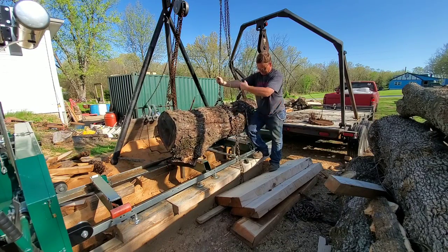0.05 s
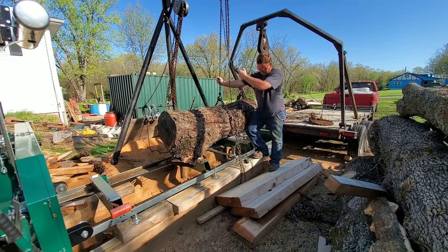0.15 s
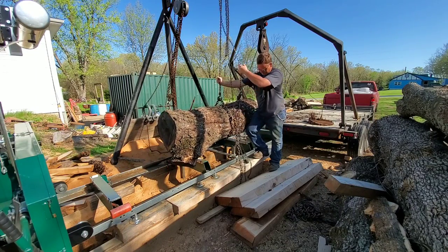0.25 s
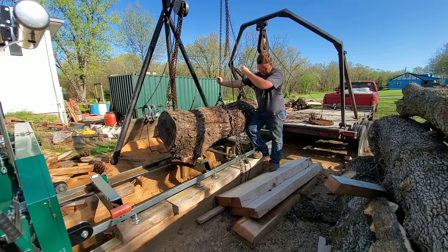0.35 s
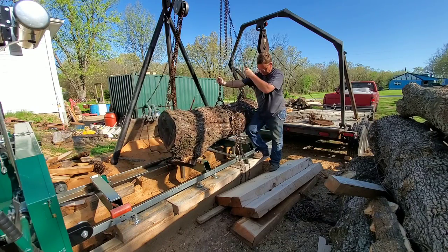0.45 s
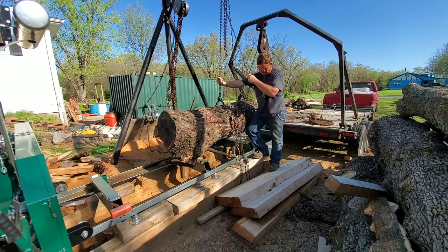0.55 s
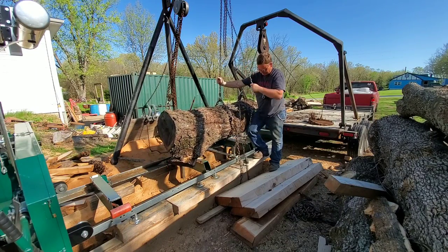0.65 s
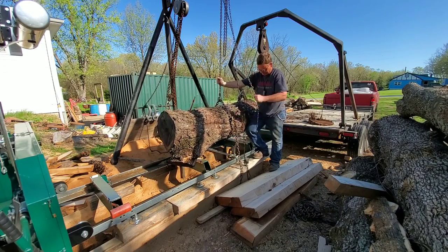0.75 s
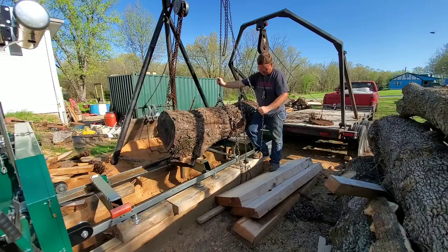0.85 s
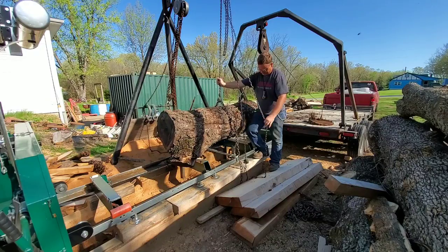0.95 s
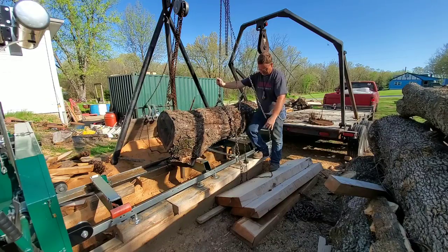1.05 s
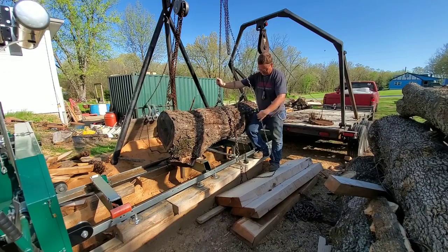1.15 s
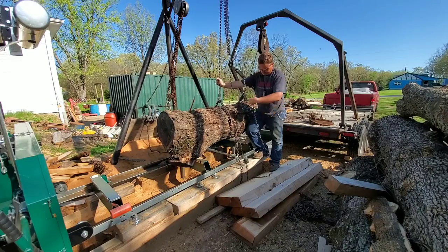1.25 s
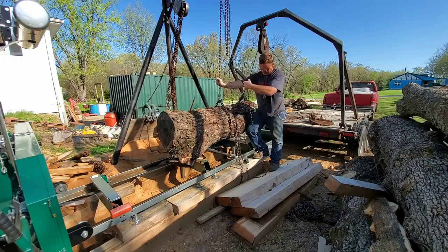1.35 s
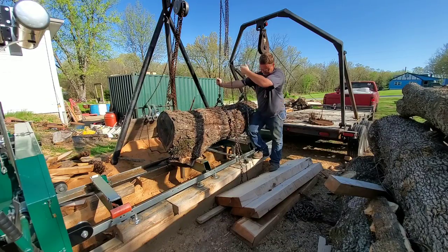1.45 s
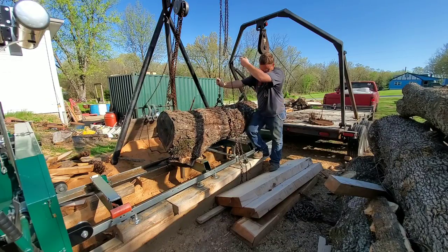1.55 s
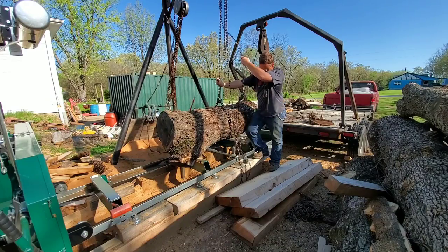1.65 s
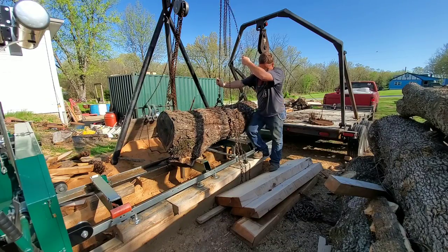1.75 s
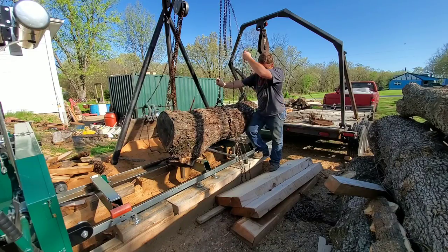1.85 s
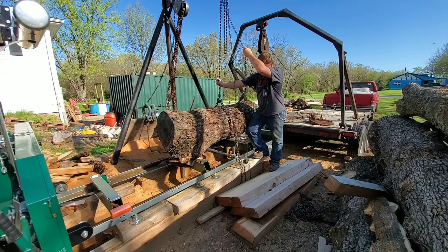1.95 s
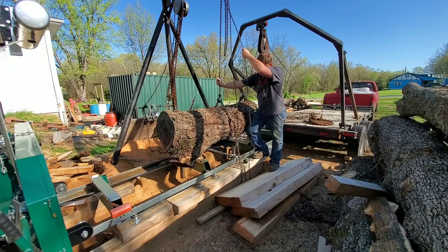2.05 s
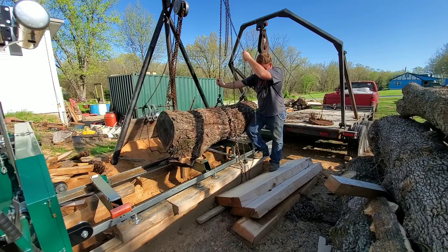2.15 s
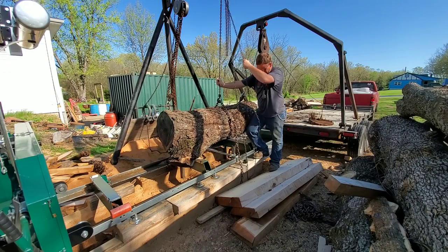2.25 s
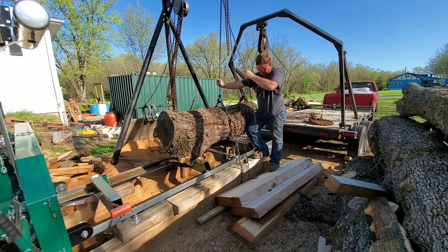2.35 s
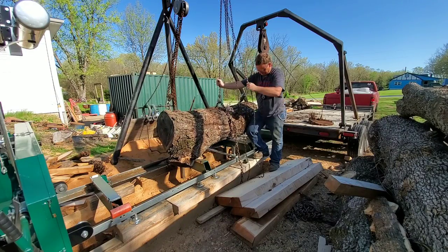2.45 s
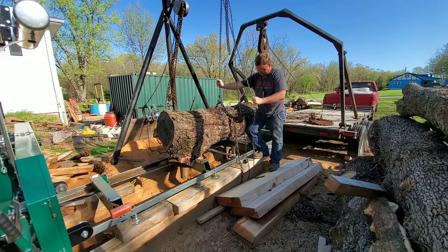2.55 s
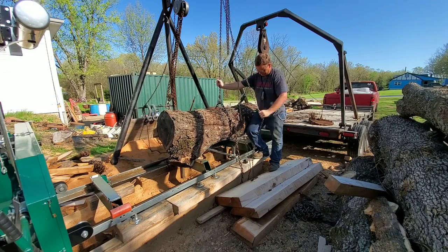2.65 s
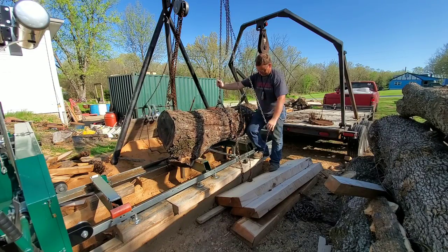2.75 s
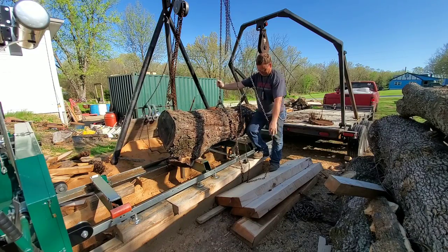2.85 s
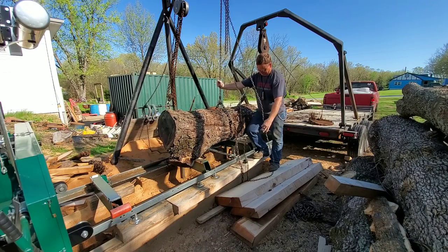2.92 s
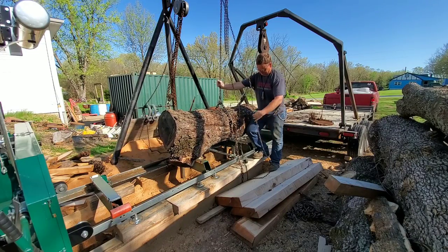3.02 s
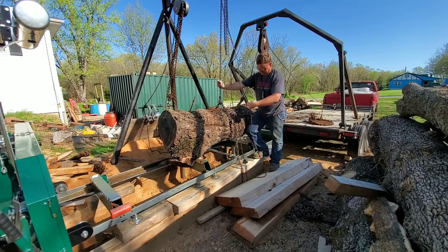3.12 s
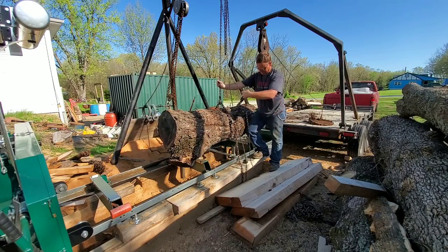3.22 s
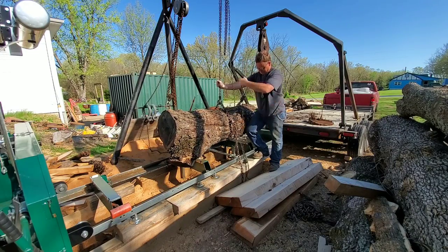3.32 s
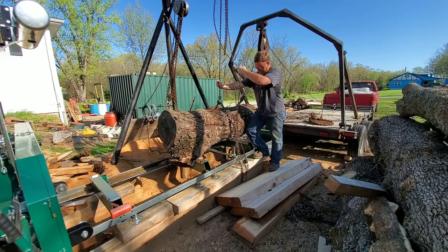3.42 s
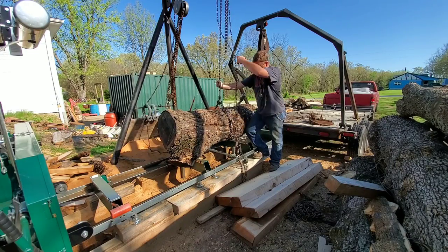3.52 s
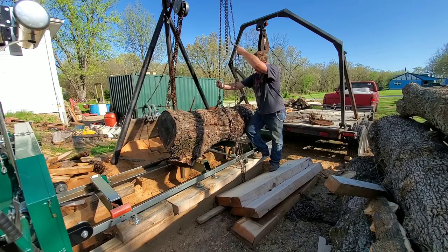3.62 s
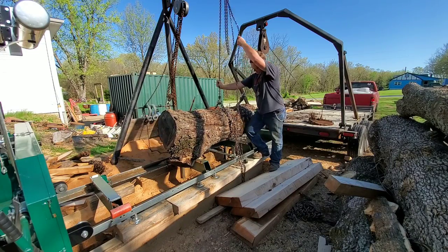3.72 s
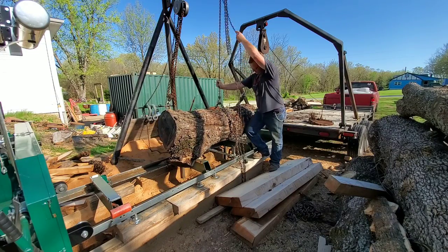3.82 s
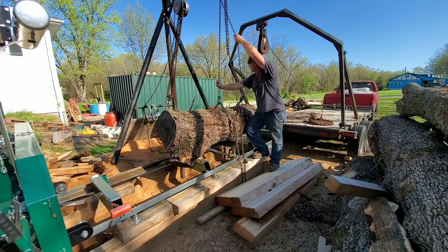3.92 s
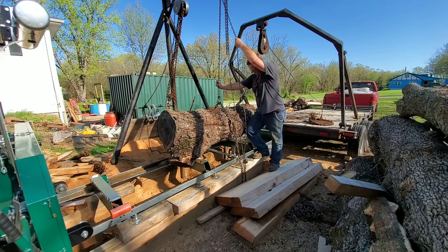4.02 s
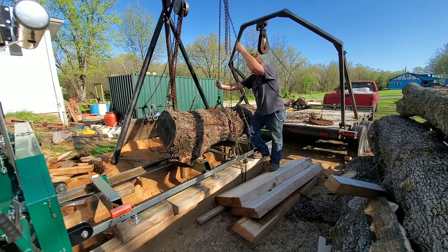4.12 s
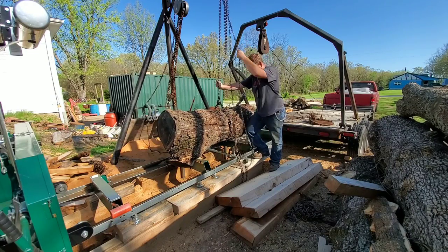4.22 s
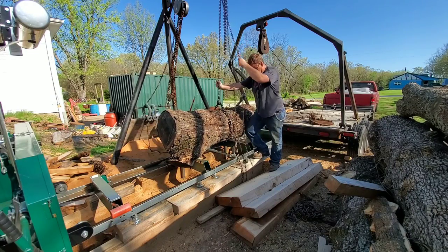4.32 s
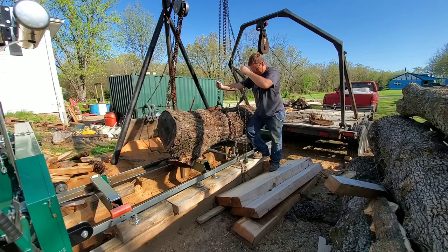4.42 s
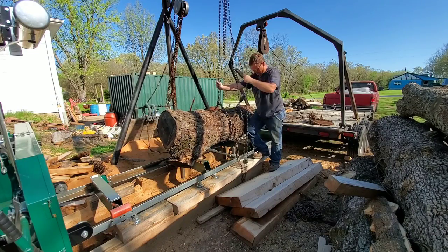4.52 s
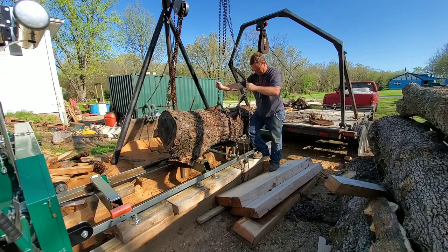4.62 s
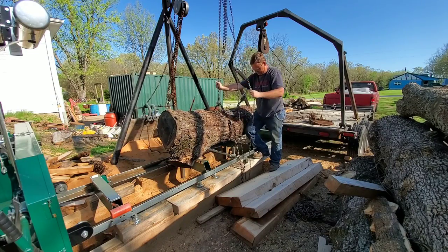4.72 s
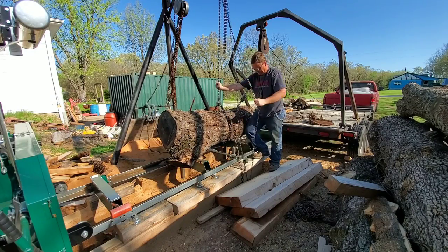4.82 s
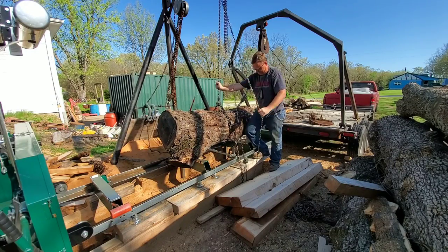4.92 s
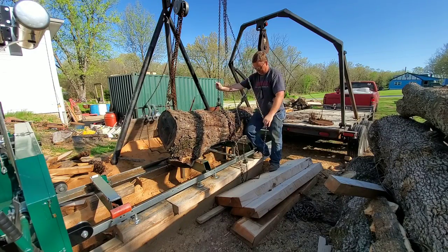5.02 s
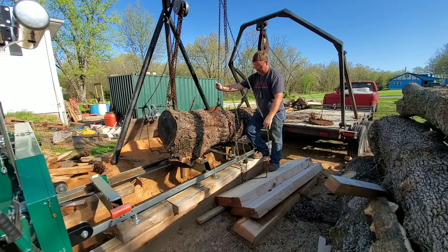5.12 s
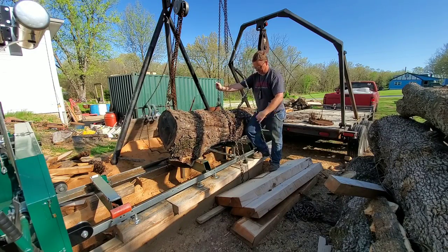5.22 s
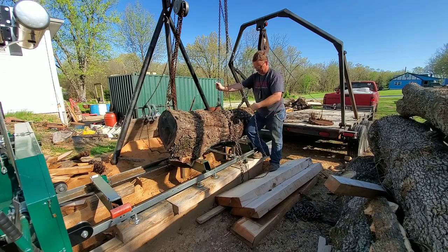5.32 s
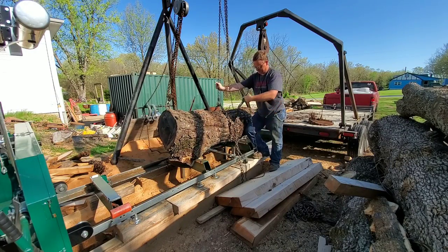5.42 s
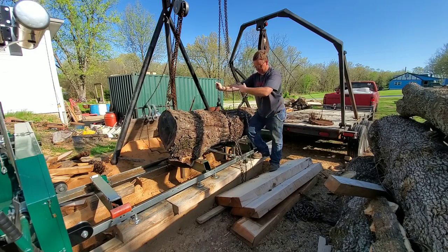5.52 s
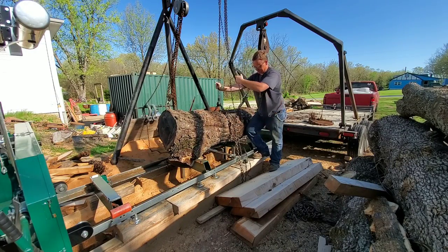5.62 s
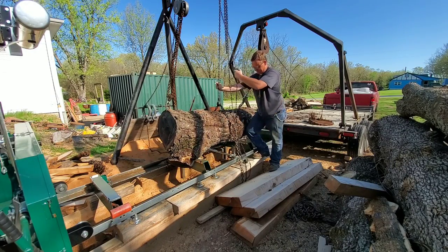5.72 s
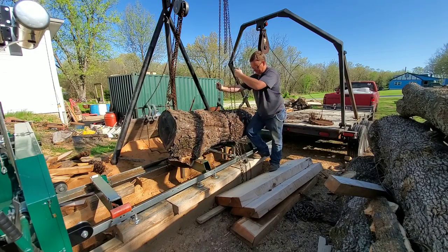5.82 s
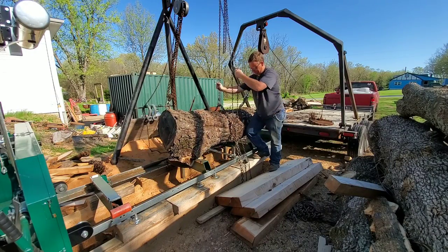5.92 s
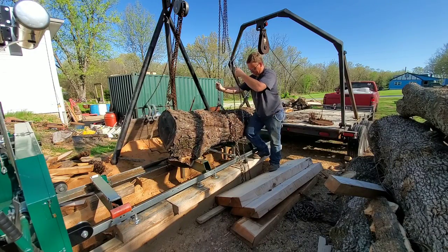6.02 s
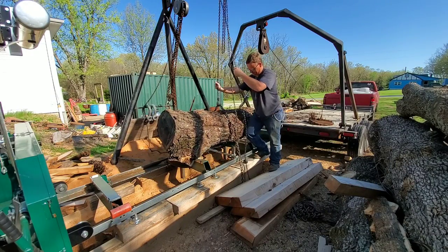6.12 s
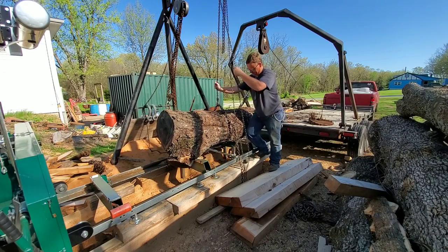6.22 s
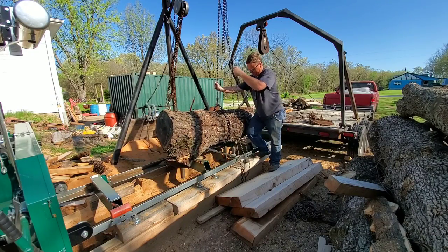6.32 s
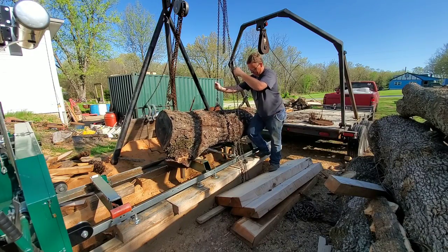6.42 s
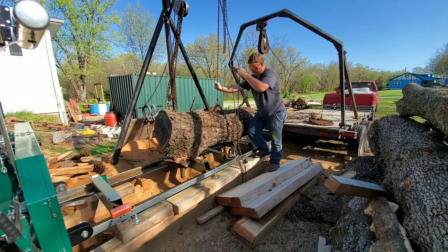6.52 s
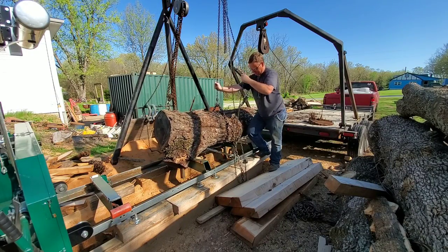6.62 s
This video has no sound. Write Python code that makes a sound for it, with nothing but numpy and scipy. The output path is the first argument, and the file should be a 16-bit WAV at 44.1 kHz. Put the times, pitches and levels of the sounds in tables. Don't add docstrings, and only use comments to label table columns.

```python
import sys
import numpy as np
from scipy import signal
from scipy.fft import rfft, irfft, next_fast_len
from scipy.io import wavfile
from scipy.ndimage import uniform_filter1d, map_coordinates

SR = 44100
rng = np.random.default_rng(int(sys.argv[2]) if len(sys.argv) > 2 else 0)


def dump(signal):
    limited = np.clip(np.atleast_2d(signal).T, -1, 1)
    pcm = np.round(limited * 32767).astype(np.int16)
    wavfile.write(sys.argv[1], SR, pcm)


def boost(x):
    u = np.asarray(x, float) / 20
    return 10 ** u


N = 294147
SPAN = 12288

# time in seconds, level in dB.
ENGINE_LEVEL = [
    (0, -88),
    (1.4, -47),
    (2.1, -40.5),
    (3.0, -52.5),
    (4.5, -43.5),
    (5.6, -50),
    (6.2, -53.5),
    (6.67, -49),
]
# frequency in Hz, spectral level in dB per Hz.
AIR_SPECTRUM = [(15, -76), (25, -23), (47, -8.5), (70, 0.5), (87, -11), (127, -10), (190, -17), (285, -18),
                (405, -31.5), (911, -29.5), (1840, -37.5), (2220, -36.5), (16000, -63.5)]
# time in seconds, frequency in Hz, level in dB.
BIRD_WHISTLE = [
    (.092, 3520, -62.5),
    (.1, 3500, -45),
    (.13, 3270, -48),
    (.15, 3120, -63),
]
# start in
# seconds, hold in seconds, frequency in Hz, level in dB.
HUMS_AND_SCRAPES = [(.01, 0.076, 272, -49.5), (0.6, 0.32, 220, -46.5), (0.656, 0.12, 514, -40.5),
                    (1.05, 0.14, 265, -44), (1.117, 0.12, 217, -46), (2.41, 0.57, 266, -49.5),
                    (3.003, 0.2, 240, -58.5), (3.422, 0.065, 417, -51.5), (3.63, 0.23, 591, -49.5),
                    (5.706, 0.033, 474, -46.5), (3.337, 0.053, 14200, -54), (3.538, .05, 14400, -44),
                    (5.55, .04, 14500, -48), (4.697, 0.43, 265.5, -47.5), (5.81, 0.093, 178, -57)]
# start in seconds, peak in dB, level of the deep leg part in dB.
JOLTS = [(0.262, -33, -30), (0.579, -26, -12), (1.035, -19.5, -18), (1.125, -26.5, -13),
         (1.245, -27, -11.5), (1.643, -31.5, -22), (1.78, -38.5, -11), (1.93, -31.5, -12),
         (2.395, -27.5, -24), (2.739, -34, -4), (3.407, -31.5, -14.5), (4.202, -16.5, -26),
         (4.485, -13.5, -19), (4.504, -15, -10), (5.693, -33, -20), (5.983, -44, -0.5), (6.594, -32.5, -20)]
# frequency in Hz, width in Hz, level in dB.
BEAM_MODES = [(410, 28, -11), (525.4, 20, 4.5), (523, 50, 2.5), (588, 39, -8.5), (668, 28, -5),
              (810, 420, -9)]
# frequency in Hz, width in Hz, level in dB.
LEG_MODES = [(205, 23, -3), (225.6, 13, 1), (317, 21, -2)]
# start in
# seconds, level in dB, frequency in Hz, 60 dB decay in seconds.
SINGLE_RINGS = [(.03, -36, 14400, .2), (0.044, -34.5, 13800, 0.42), (0.16, -27.5, 4530, 0.14),
                (1.21, -27, 1745, 0.27), (4.742, -10.5, 1745, 0.11), (4.79, -10.5, 1745, 0.17),
                (3.523, -43, 1735, 0.14), (3.53, -42, 822, 0.36), (3.627, -28, 865, 0.18),
                (3.631, -40, 916, 0.48), (3.63, -49, 1770, .4), (2.791, -17, 1600, 0.092),
                (2.908, -22.5, 1745, 0.4), (2.83, -18, 866, 0.087), (5.293, -25, 908, 0.31),
                (6.82, -26, 1502, 0.37), (4.335, -30, 490, 0.17), (4.488, -25, 214, 0.17),
                (4.5, -14, 540, 0.066), (2.4, -35.5, 780, 0.18), (1.62, -41.5, 360, 0.43)]
# start in seconds, peak in dB.
LINK_TICKS = [(0.262, -36), (1.588, -40), (1.6166, -29), (1.6386, -24), (1.8955, -12), (2.0561, -26),
              (3.2768, -44), (3.3349, -34), (3.3489, -33), (3.406, -25), (3.4237, -30), (3.4906, -44),
              (3.507, -42), (3.518, -40), (3.5599, -22), (3.6148, -30), (3.6706, -32), (3.7101, -35),
              (3.7799, -27), (5.305, -40), (5.343, -42), (5.4703, -35), (5.5661, -32), (5.5783, -13.5),
              (5.7103, -16), (6.336, -54), (0.942, -14), (1.0035, -12), (4.4885, -12), (6.5207, -48),
              (6.567, -32.5), (6.5888, -27)]
# time in seconds, running level in dB.
CHAIN_EFFORT = [(0, -37.5), (.5, -39.5), (.8, -25.5), (1.0, -28.5), (1.41, -44.5), (2.27, -31),
                (2.53, -27.5), (2.79, -23), (3.21, -45.5), (4.03, -39), (4.44, -23), (5.03, -26),
                (5.29, -37.5), (5.48, -43), (5.89, -38.5), (6.46, -70), (6.67, -30)]
# frequency in Hz, spectral level in dB per Hz.
LINK_SPECTRUM = [(1180, -20), (2000, -9.5), (2760, -8.5), (3170, 0.5), (3840, -5.5), (5880, -8.5),
                 (7980, -6), (9330, -3.5), (14400, -5.5), (16000, -6.5)]
# frequency in Hz, width in Hz, level in dB.
HOUSING_MODES = [(864, 27, 5), (938, 20.7, 1.5), (1019, 37, -0.5), (1213, 30, 0), (1518, 103, -2.5),
                 (1697, 180, -3), (1742, 49.3, 4), (1850, 33, -13), (2370, 330, -19), (3130, 250, -11.5),
                 (3167, 25, 2), (3366, 19, -4), (4346, 19, -7), (6030, 230, -14)]
# frequency in Hz, level in dB, 60 dB decay in seconds.
TUBE_MODES = [(1910, 7, 0.25), (3510, 6.5, 0.49), (2020, 15, 0.062), (4090, 6, 0.36), (4400, 2.5, 0.4),
              (4540, 0, 0.63), (4470, 1.5, 0.38), (4714, 7, 0.42), (2110, 2.5, 0.067), (2560, 14.5, 0.075),
              (6040, 4.5, 0.34), (4880, -4.5, 0.087), (6750, 2, 0.28), (5170, -18.5, 0.13)]
# frequency in Hz, spectral level in dB per Hz.
SLAP_SPECTRUM = [(410, -13), (700, -3), (1020, -10.5), (1200, 4), (1480, -2.5), (2160, 4), (2730, -0.5),
                 (4610, -2), (10000, -13), (16000, -46.5)]
# start in seconds, peak in dB, middle modes in dB,
# bright parts in dB, 60 dB chatter decay in seconds.
FIRST_PULL = [(0.551, -21, -9.5, -4, 0.14), (0.574, -15, -9.5, -5.5, 0.032), (0.631, -12, -14, -10, 0.12),
              (0.66, -16, -8, -4.5, 0.046), (0.68, -15, -1.5, -2, 0.25), (0.727, -16.5, -7, -1, 0.07),
              (0.774, -17, 0.5, -7, 0.044), (0.811, -17, 0, -8, 0.026), (0.838, -28, -21, 5, 0.032),
              (0.845, -15, -3, -6, 0.032), (0.879, -16, -17, -10.5, 0.043), (0.912, -12, -14.5, -9, 0.033),
              (0.941, -11, -8.5, -7, 0.033), (0.973, -12.5, -1.5, -6, 0.06),
              (1.002, -12, -2.5, -11.5, 0.044), (1.01, -18.5, -4, 1.5, 0.047),
              (1.033, -11.5, -1.5, -6.5, 0.11), (1.065, -16, -6.5, -6.5, 0.013),
              (1.096, -14.5, -2, -11, 0.023), (1.126, -19, -13, -1.5, 0.14), (1.173, -15, -25, -9, 0.4),
              (1.244, -20, -4, -8, 0.066)]
SECOND_PULL = [(2.175, -28, -6, -28, 0.069), (2.2, -29, 2.5, -4.5, 0.11), (2.286, -17, 1.5, -7, 0.11),
               (2.351, -15.5, -0.5, -6, 0.071), (2.387, -14.5, -20, -6, 0.05),
               (2.399, -13, -1.5, -5, 0.026), (2.44, -15.5, 0, -6.5, 0.022),
               (2.472, -12.5, -8.5, -9.5, 0.029), (2.506, -20.5, -3, -4, 0.046),
               (2.538, -17, 2.5, -6, 0.046), (2.572, -18, 1.5, -0.5, 0.068), (2.6, -17.5, 1.5, -7, 0.05),
               (2.63, -13.5, 0, -6, 0.05), (2.658, -15.5, -3, -2.5, 0.095), (2.684, -16, -12, -2.5, 0.076),
               (2.712, -19, -5, -8, 0.054), (2.738, -20.5, 3.5, -3, 0.05), (2.763, -13, -2, -8, 0.059),
               (2.791, -12.5, 3, -7.5, 0.077), (2.821, -19.5, -1, -4.5, 0.055),
               (2.846, -18.5, -6, -4, 0.044), (2.871, -16, -9.5, -8, 0.055), (2.905, -18, -3, -9, 0.045),
               (2.941, -18.5, 6, -5, 0.041), (2.988, -20, -2, -8.5, 0.05), (3.018, -33, -24, -8, 0.05),
               (3.056, -40, 2.5, 1.5, 0.026)]
THIRD_PULL = [(4.065, -23.5, -7, -5, 0.03), (4.137, -24.5, -9, -8, 0.15), (4.167, -23, -2, -5, 0.17),
              (4.201, -20.5, -6, -1.5, 0.016), (4.224, -18, -1.5, -3.5, 0.1),
              (4.272, -23.5, -16, -3.5, 0.041), (4.287, -11.5, -2.5, -8, 0.1), (4.337, -26.5, 5, 2, 0.086),
              (4.345, -14.5, 0.5, -2, 0.07), (4.36, -25, -4, 7.5, 0.25), (4.396, -22.5, -16, -3.5, 0.065),
              (4.405, -11.5, -1.5, -9.5, 0.037), (4.454, -8.5, -0.5, -5.5, 0.052),
              (4.489, -9, -9, -6.5, 0.053), (4.505, -18.5, 10.5, 0.5, 0.12), (4.557, -17.5, 3.5, -5, 0.012),
              (4.601, -17, -3, -5.5, 0.065), (4.648, -11, 1.5, -9, 0.036), (4.691, -14.5, -5, -3.5, 0.16),
              (4.742, -8, -11.5, -15.5, 0.025), (4.767, -34, -7, -9, 0.042), (4.793, -19.5, 9.5, 2, 0.035),
              (4.84, -13, -1, -6, 0.098), (4.886, -10, 2, -5.5, 0.054), (4.93, -13, -0.5, -3.5, 0.08),
              (4.972, -11, -3, -6, 0.021), (5.007, -13.5, -7.5, -5, 0.053), (5.048, -16.5, 2.5, -1, 0.088),
              (5.086, -18.5, 4.5, -2.5, 0.045), (5.12, -15.5, 0, -4.5, 0.094), (5.161, -14.5, 1, -8, 0.062),
              (5.208, -19.5, -1.5, -8.5, 0.05), (5.288, -24.5, -5.5, -12, 0.25)]
# start in seconds, tube level in dB, links level in dB.
CHAIN_SLAPS = [(.15, -26.5, -36), (0.313, -27.5, -43), (1.455, -32, -37), (1.617, -33, -59),
               (1.646, -22, -25), (1.784, -46, -73), (1.833, -42, -63), (1.892, -37, -24),
               (2.053, -25, -64), (3.131, -31, -42.5), (4.05, -67, -57), (3.507, -71, -73),
               (3.741, -36.5, -52), (3.843, -31.5, -42.5), (5.472, -28, -37.5), (5.691, -48, -67),
               (5.711, -19.5, -28), (5.85, -30.5, -41.5), (6.167, -40.5, -52.5), (6.588, -24, -44)]
# start in seconds, housing level in dB, middle modes in dB,
# tube and links level in dB.
WHEEL_TUGS = [(0.041, -60, -20, -47), (0.246, -23.5, -19, -35), (0.261, -26, -4, -34),
              (0.407, -23, -14, -38), (0.454, -17.5, 1.5, -26.5), (1.29, -28, -6, -58),
              (1.362, -32, -9, -39), (1.404, -39, -7.5, -49), (1.589, -31, -4, -53), (1.632, -24, 1, -35),
              (1.886, -26.5, -4, -46), (1.896, -12, -4.5, -19.5), (1.982, -33, -18, -35.5),
              (2.045, -29, 3, -35), (3.188, -33, -5, -50), (3.258, -39, -4, -65),
              (3.407, -25.5, 3.5, -35.5), (3.421, -27.5, 2, -53), (3.524, -37.5, -1, -46),
              (3.569, -50, -14, -59), (3.629, -29, -11, -40), (3.712, -43, -15, -42),
              (3.784, -37, -16, -36.5), (3.903, -24.5, 1.5, -36), (3.908, -19, -1, -46),
              (3.946, -27.5, -19, -38.5), (5.377, -42, -11, -67), (5.44, -42, -9, -58),
              (5.461, -33, 10, -39), (5.625, -51, -3, -49), (5.664, -30.5, -6, -59),
              (5.679, -28, -1.5, -37), (5.796, -39, -15, -39), (5.827, -41.5, 0.5, -43),
              (5.921, -20.5, -1, -34.5), (5.984, -40, 7, -67), (6.006, -26.5, -3, -47),
              (6.075, -45, -2.5, -51), (6.103, -32, -3.5, -42.5), (6.248, -41, 1, -51.5),
              (6.524, -38.5, -0.5, -49.5), (6.549, -47.5, 4, -57), (6.578, -36, 6, -28),
              (6.654, -26.5, -1, -37)]
# start in seconds, level in dB, 60 dB chatter decay in seconds.
LINK_CLINKS = [(0.042, -32, 0.004), (0.4052, -29.5, 0.012), (0.4568, -14, 0.0097), (0.513, -26, 0.0097),
               (1.289, -32, 0.006), (1.363, -34, 0.0075), (1.4116, -29.5, 0.0069), (1.583, -44, 0.006),
               (1.6033, -40, 0.0051), (1.6324, -31, 0.0034), (1.711, -19.5, 0.011), (1.89, -16, 0.0042),
               (1.897, -6, 0.013), (2.156, -29, 0.006), (3.244, -37.5, 0.0066), (3.276, -41, 0.0067),
               (3.3823, -38, 0.0063), (3.403, -28, 0.0042), (3.4233, -21.5, 0.0059), (3.4905, -46, 0.0054),
               (3.5064, -50, 0.0044), (3.5184, -39, 0.006), (3.5349, -30.5, 0.01), (3.671, -30.5, 0.0051),
               (3.6894, -37, 0.006), (3.711, -29, 0.0043), (3.7264, -29, 0.009), (3.812, -38, 0.006),
               (3.8866, -30, 0.0065), (3.8996, -22.5, 0.022), (3.947, -20.5, 0.0099), (4.0018, -42, 0.006),
               (4.052, -30, 0.0036), (5.3772, -56, 0.0078), (5.4166, -47, 0.005), (5.4544, -42, 0.0049),
               (5.576, -29, 0.0058), (5.6246, -37, 0.0067), (5.694, -36, 0.0037), (5.9256, -19, 0.011),
               (5.9834, -41, 0.006), (6.007, -33, 0.014), (6.0686, -40, 0.0071), (6.104, -31, 0.0085),
               (6.1384, -53, 0.0049), (6.335, -48, 0.0073), (6.5246, -53, 0.006), (6.549, -56, 0.0053)]
# frequency in Hz, correlation from 0 to 1.
LIKENESS = [(40, 0.82), (140, 0.96), (330, 0.89), (700, 0.66), (1650, 0.43), (4970, 0.21), (15000, 0.29)]
# frequency in Hz, left over right in dB.
SIDE_LEAN = [(60, 1), (150, -1.5), (380, 1), (950, 0.5), (2380, 0.5), (5980, -4.5), (15000, -1.5)]
# frequency in Hz, width in Hz, depth from 0 to 1.
CASE_NOTCHES = [
    (8005, 285, 0.93),
    (10700, 950, 0.68),
]


def unit(x):
    return x / np.sqrt(np.mean(x ** 2) + 1e-20)


def along(points, hz):
    f, v = np.transpose(points)
    return np.interp(np.log(hz + 1), np.log(f + 1), v)


def curves(rows):
    s, *cols = np.transpose(rows)
    return [np.interp(np.arange(N) / SR, s, c) for c in cols]


def wobble(rate):
    return map_coordinates(rng.standard_normal(int(N * rate / SR) + 4), [np.arange(N) * rate / SR])


def fall_db(t, t60):
    return -60 * t / t60


def add_at(out, s, sound):
    out[:, round(s * SR):][:, :sound.shape[1]] += sound


def filtered(x, response):
    m = next_fast_len(x.shape[-1] + 2048)
    return irfft(rfft(x, m) * response(np.fft.rfftfreq(m, 1 / SR)), m)[..., :x.shape[-1]]


def resonances(modes, scatter_db=0):
    c, w, db = np.transpose(modes)[:, :, None]
    strength = unit(boost(scatter_db * rng.standard_normal(len(modes))))
    gain = strength * (-1) ** np.arange(len(modes)) * boost(db[:, 0])
    return lambda f: gain @ (1j * f * w / (c * c - f * f + 1j * f * w))


def metallic(spectrum, peaks_db):
    peaks = peaks_db * rng.standard_normal(400)
    return lambda f: boost(along(spectrum, f) + np.interp(f, np.linspace(0, SR / 2, len(peaks)), peaks))


def spiky(shape, spread_db):
    return unit(rng.standard_normal(shape) * boost(spread_db * rng.standard_normal(shape)))


def stereo(pair):
    def mid_side(hz):
        angle = np.arccos(np.clip(along(LIKENESS, hz), -1, 1)) / 2
        return np.array([np.cos(angle), np.sin(angle)])
    mid, side = filtered(pair, mid_side)
    return np.array([mid + side, mid - side])


def engine_order(hz, drift):
    phase = 2 * np.pi * np.cumsum(hz + drift * wobble(2.9)) / SR
    return np.sqrt(2) * np.sin(phase) * boost(3.5 * wobble(6.1))


def yard():
    upper_db, = curves(ENGINE_LEVEL)
    engine = boost(upper_db) * engine_order(81, drift=0.68) + boost(-53) * engine_order(62.5, drift=3.53)
    air = unit(filtered(rng.standard_normal((2, N)), lambda f: boost(along(AIR_SPECTRUM, f))))
    return engine + boost(-51 + 0.3 * wobble(5.3)) * stereo(air)


def bird():
    hz, db = curves(BIRD_WHISTLE)
    t = np.arange(N) / SR
    sounding = (t > BIRD_WHISTLE[0][0]) * (t < BIRD_WHISTLE[-1][0])
    return boost(db) * sounding * np.sin(2 * np.pi * np.cumsum(hz) / SR)


def effort(level_db, grows):
    return level_db + grows * (curves(CHAIN_EFFORT)[0] + 30)


def frame():
    t = np.arange(N) / SR

    def mode(hz, width_hz):
        return unit(filtered(spiky((2, N), spread_db=6.5), resonances([(hz, width_hz, 0)])))

    hums = 0
    for s, hold_s, hz, db in HUMS_AND_SCRAPES:
        swell_db = -300 * np.maximum(s - t, 0) - 120 * np.maximum(t - s - hold_s, 0)
        speed = 0.5 + hz / 4000
        hums = hums + boost(db + speed * swell_db) * mode(hz, 0.038 * hz)
    rumble = boost(effort(level_db=-45, grows=0.48)) * mode(548, 400)
    return stereo(hums + rumble)


def thuds():
    out, t = np.zeros((2, N + SPAN)), np.arange(SPAN // 2) / SR
    for s, db, deep_db in JOLTS:
        push = spiky((2, len(t)), spread_db=8) * boost(fall_db(t, 0.14))
        beam = filtered(push, resonances(BEAM_MODES, scatter_db=3.5))
        legs = filtered(push, resonances(LEG_MODES, scatter_db=11.5))
        add_at(out, s, boost(db + 23) * (beam + boost(deep_db + 4.5) * legs))
    return stereo(out[:, :N])


def tinks():
    t = np.arange(N) / SR
    out = 0
    for s, db, hz, t60 in SINGLE_RINGS:
        out = out + (t > s) * boost(db + fall_db(np.abs(t - s), t60)) * np.sin(2 * np.pi * hz * t)
    return out


def ticks():
    out, t = np.zeros((2, N + SPAN)), np.arange(SPAN // 8) / SR
    for s, db in LINK_TICKS:
        envelope = boost(fall_db(t, .004)) + boost(-10 + fall_db(t, .03))
        burst = rng.standard_normal((2, len(t))) * envelope
        add_at(out, s, boost(db - 6) * burst * (1 - t / t[-1]))
    return stereo(filtered(out[:, :N], lambda f: (1j * f / (5000 + 1j * f)) ** 2))


def running_chain():
    clumps_db = 2.5 * wobble(30)
    grind = unit(filtered(spiky((2, N), spread_db=6), resonances(HOUSING_MODES)))
    grind_db = effort(level_db=-30.5, grows=1.54) + clumps_db - 7.5
    z = signal.stft(spiky((2, N), spread_db=1.5), nperseg=1024)[2]
    singing = uniform_filter1d(rng.standard_normal(z.shape[1:]), 5, axis=1) * np.sqrt(5)
    jingle = signal.istft(z * boost(6.1 * singing), nperseg=1024)[1][:, :N]
    jingle = unit(filtered(jingle, lambda f: boost(along(LINK_SPECTRUM, f))))
    jingle_db = effort(level_db=-34.5, grows=1.64) + clumps_db - 6.5
    return stereo(boost(grind_db) * grind + boost(jingle_db) * jingle)


def strikes():
    rows = []
    usual_db = -12
    for s, db, middle_db, bright_db, chatter_s in FIRST_PULL + SECOND_PULL + THIRD_PULL:
        excess_db = db + bright_db - usual_db
        crisp_db = -3 * np.log2(np.clip(chatter_s, .01, .3) * 20)
        tube_db = usual_db - 12 + 0.71 * excess_db
        links_db = usual_db - 7 + 0.99 * excess_db + crisp_db
        rows.append((s, db + 10, middle_db + 2.5, bright_db + 7, tube_db, links_db, chatter_s))
    for s, db, links_db in CHAIN_SLAPS:
        rows.append((s, db - 26.5, 0, 0, db, links_db, 0.072))
    for s, db, middle_db, side_db in WHEEL_TUGS:
        rows.append((s, db + 6, middle_db + 2.5, -3, side_db - 6, side_db - 15, 0.051))
    for s, db, chatter_s in LINK_CLINKS:
        rows.append((s, -120, 0, 0, -120, db - 12, chatter_s))
    return rows


def housing(middle_db, bright_db):
    modes = []
    for hz, width_hz, db in HOUSING_MODES:
        raised_db = middle_db if 1350 < hz < 2300 else bright_db * (hz > 2300)
        modes.append((hz * (1 + .012 * rng.standard_normal()), width_hz, db + raised_db))
    return resonances(modes, scatter_db=4)


def clack(t, housing_db, middle_db, bright_db, chatter_s):
    chatter_s = np.clip(chatter_s, .01, .3)
    blow = signal.windows.hann(9)
    envelope = boost(-12 + fall_db(t, chatter_s)) + boost(-18.5 + fall_db(t, 0.52))
    push = spiky((2, len(t)), spread_db=6.5) * envelope
    push[0, :len(blow)] += boost(11 - 0.5 * np.log2(chatter_s * 20)) * blow
    sound = boost(housing_db + 9) * filtered(push, housing(middle_db, bright_db))
    sound[0, :len(blow) - 1] += boost(housing_db - 19) * np.diff(blow)
    return sound


def tube_rings(t):
    hz, db, t60 = np.transpose(TUBE_MODES)[:, :, None]
    clear = boost(db + fall_db(t, np.clip(t60, .04, .22))) * np.exp(2j * np.pi * hz * t)
    fine_hz = 1900 + 11000 * rng.random((40, 1)) ** 1.2
    fine_db = along(SLAP_SPECTRUM, fine_hz) - 4 + fall_db(t, 0.022 + 0.58 * rng.random((40, 1)))
    fine = boost(fine_db) * np.exp(2j * np.pi * fine_hz * t)
    return np.vstack([clear, fine]).astype(np.complex64)


def tube_slap(t, tube_db, rings, rebounds):
    shape = (2, len(rings))
    strengths = boost(4 * rng.standard_normal(shape)) * np.exp(2j * np.pi * rng.random(shape))
    rise = 1 - np.exp(-t / .0025)
    dense = unit(filtered(spiky((2, len(t)), spread_db=2.5), metallic(SLAP_SPECTRUM, peaks_db=6)))
    crack = boost(4 + fall_db(t, 0.0091))
    dying = boost(fall_db(t, 0.25)) * rebounds * rise ** 0.13 + crack
    ringing = rise * (strengths.astype(np.complex64) @ rings).imag
    return boost(tube_db) * (boost(-1) * dense * dying + boost(-16) * ringing)


def link_shake(t, links_db, chatter_s, rebounds):
    shake = unit(filtered(spiky((2, len(t)), spread_db=0.5), metallic(LINK_SPECTRUM, peaks_db=4.5)))
    rise = 1 - np.exp(-t / (0.045 * np.clip(chatter_s, .003, .06)))
    fade_s = 3.38 * np.clip(chatter_s, .003, .3)
    settling = boost(fall_db(t, fade_s)) + boost(-1.5 + fall_db(t, np.minimum(0.17, 2 * fade_s)))
    return boost(links_db + 3) * shake * rise * rebounds * settling


def contacts():
    out, t = np.zeros((2, N + SPAN)), np.arange(SPAN // 2) / SR
    rings = tube_rings(t)
    for s, housing_db, middle_db, bright_db, tube_db, links_db, chatter_s in strikes():
        landing_db = np.interp(t, np.linspace(0, t[-1], 40), rng.standard_normal(40))
        rebounds = boost(2 * (t > .008) * landing_db)
        sound = clack(t, housing_db, middle_db, bright_db, chatter_s)
        sound = sound + tube_slap(t, tube_db, rings, rebounds)
        sound = sound + link_shake(t, links_db, chatter_s, rebounds)
        add_at(out, s, sound * np.sqrt(1 - t / t[-1]))
    return stereo(out[:, :N])


def scene():
    background = yard() + bird()
    gantry = frame() + thuds() + tinks()
    return background + gantry + ticks() + running_chain() + contacts()


def roll_off(x):
    return signal.sosfilt(signal.butter(12, 16800, fs=SR, output="sos"), x)


def record(dry):
    def microphone(f):
        case = np.prod([1 - depth / (1 + (2 * (f - hz) / w) ** 2) for hz, w, depth in CASE_NOTCHES], axis=0)
        lean = boost(along(SIDE_LEAN, f) / 2 * np.array([[1], [-1]]))
        top = 1 / (1 + np.exp(np.clip((f - 15750) / 60, -40, 40)))
        return case * lean * top

    hiss = boost(-76) * rng.standard_normal(dry.shape)
    heard = filtered(dry + hiss, microphone)
    held = heard / (1 + np.abs(heard / 1.05) ** 4) ** (1 / 4)
    return roll_off(held)


dry = scene()
out = record(dry)
dump(out)
```